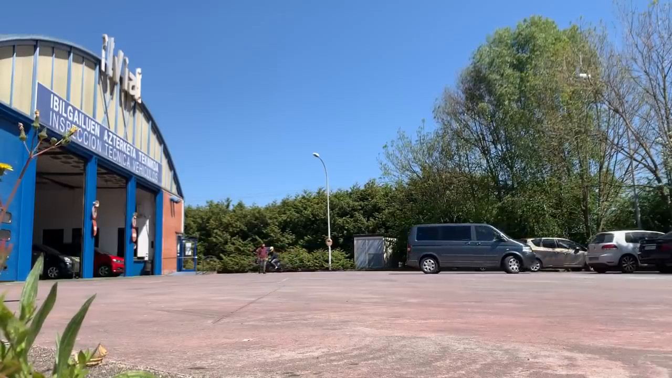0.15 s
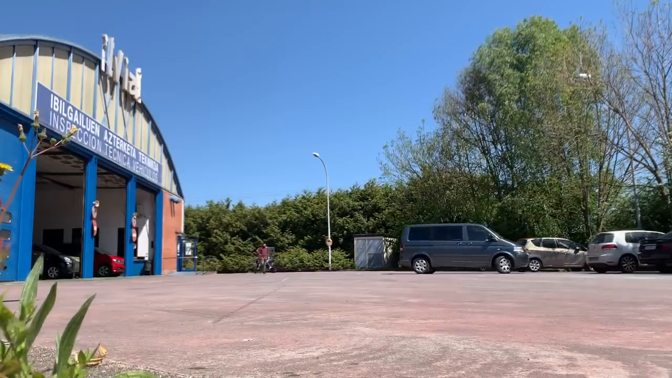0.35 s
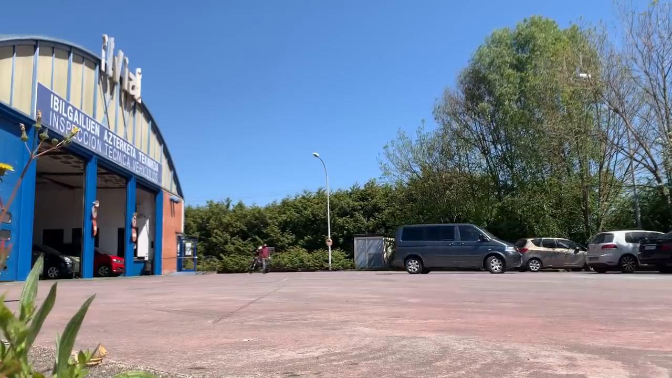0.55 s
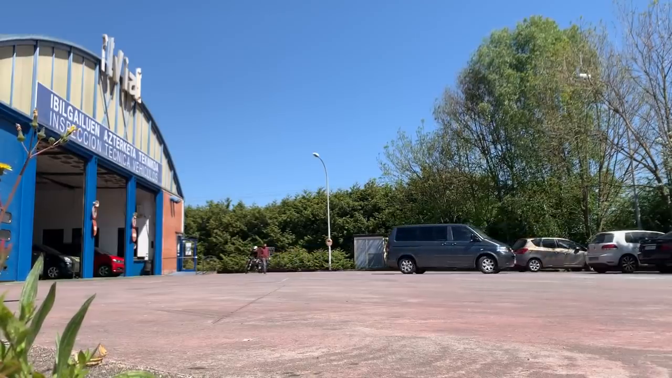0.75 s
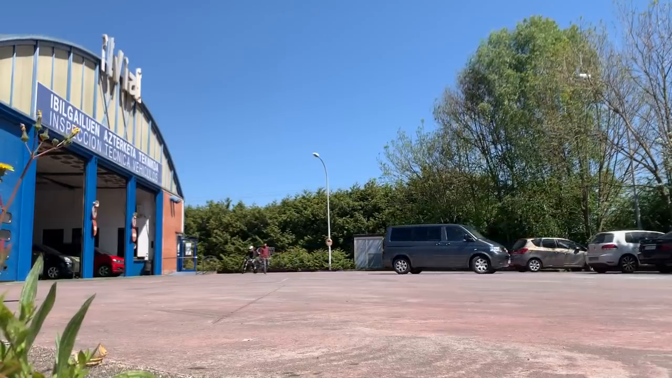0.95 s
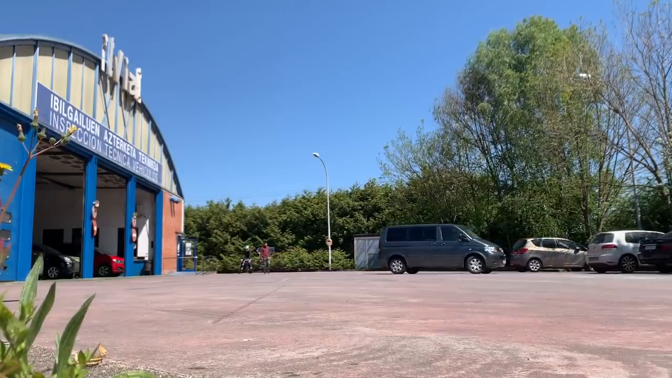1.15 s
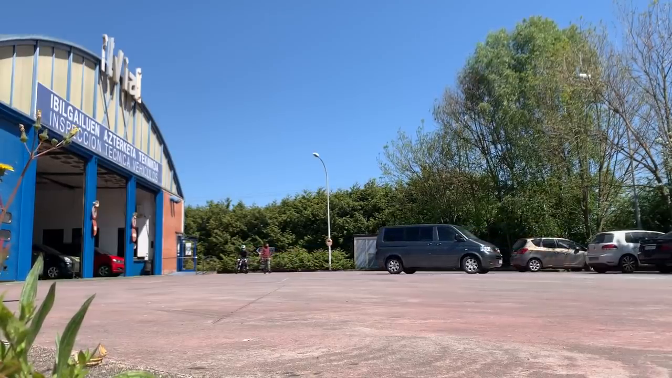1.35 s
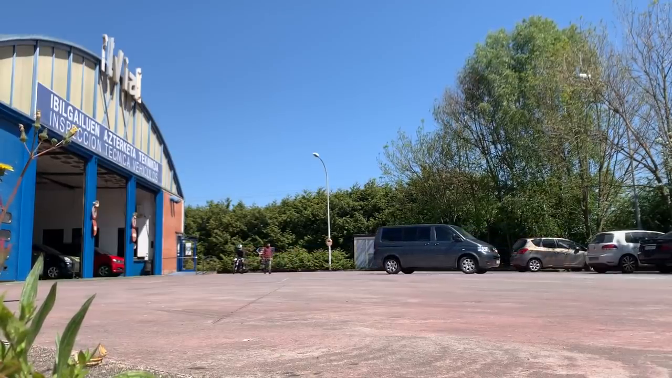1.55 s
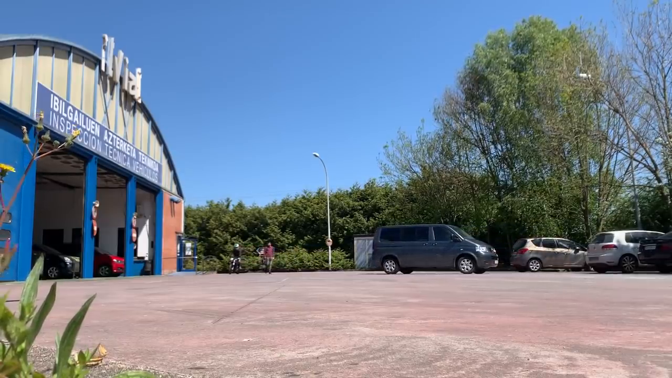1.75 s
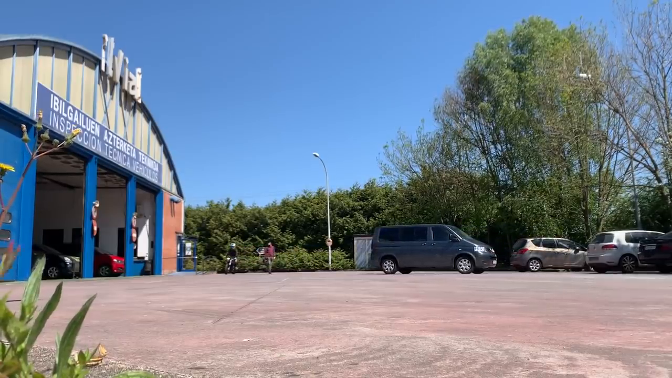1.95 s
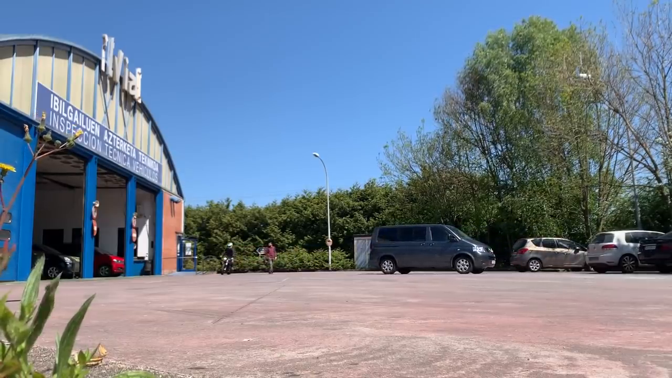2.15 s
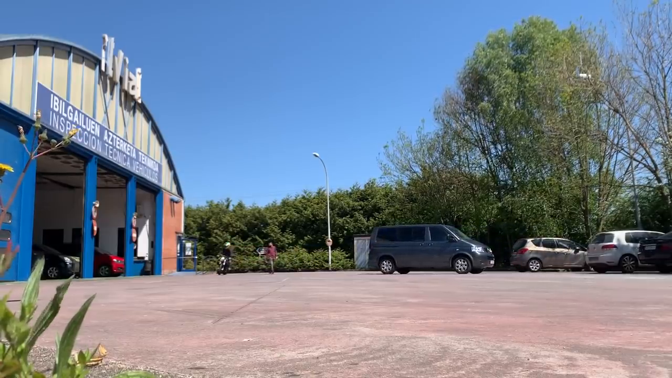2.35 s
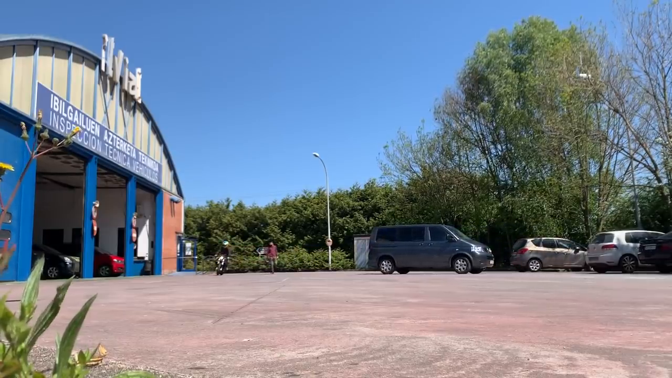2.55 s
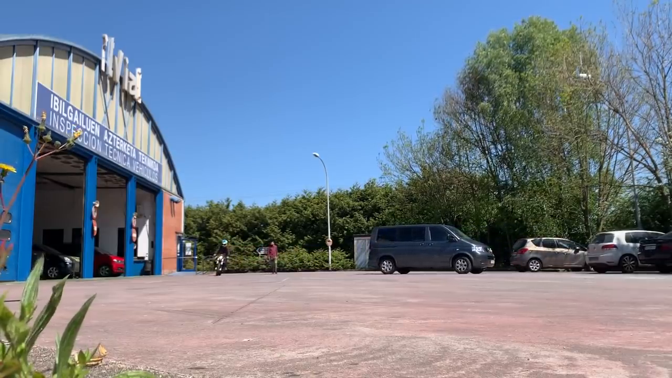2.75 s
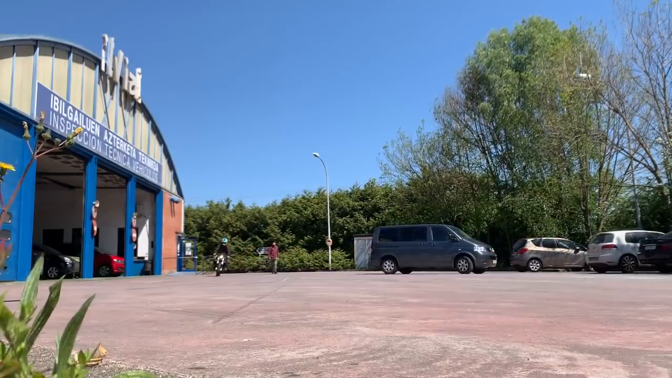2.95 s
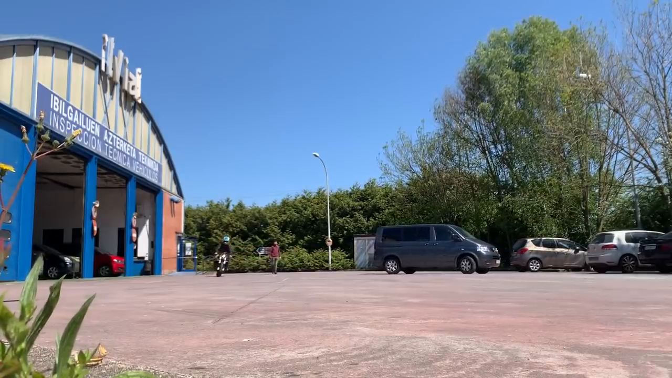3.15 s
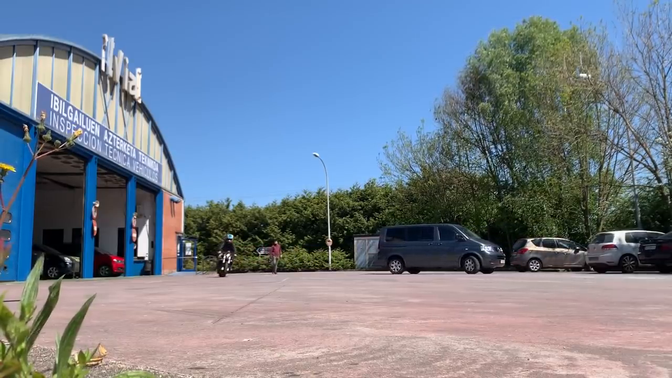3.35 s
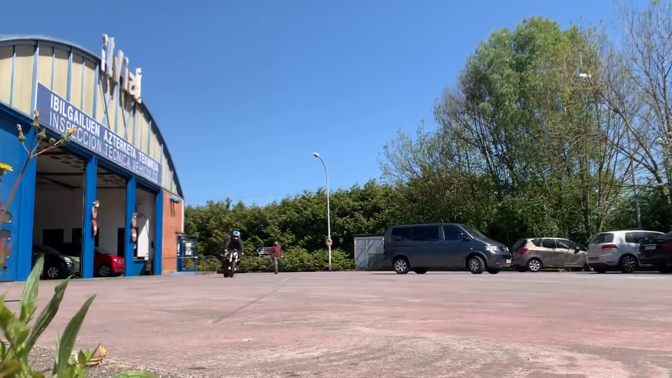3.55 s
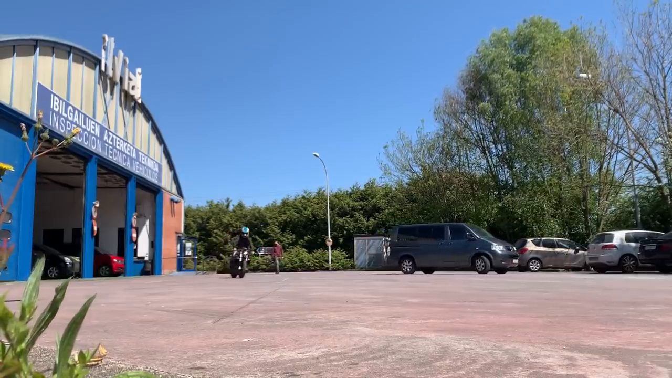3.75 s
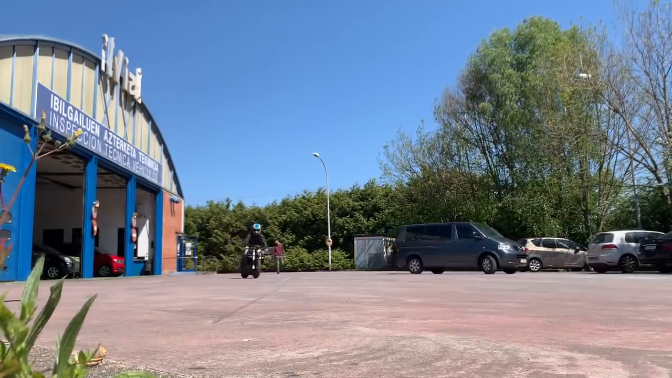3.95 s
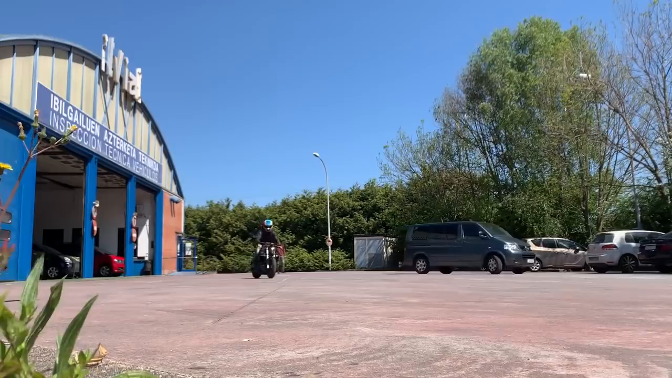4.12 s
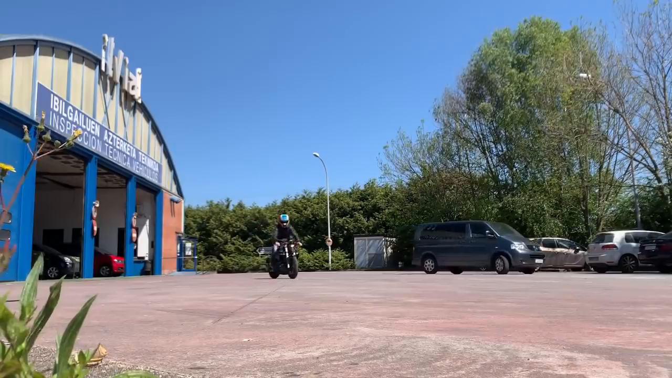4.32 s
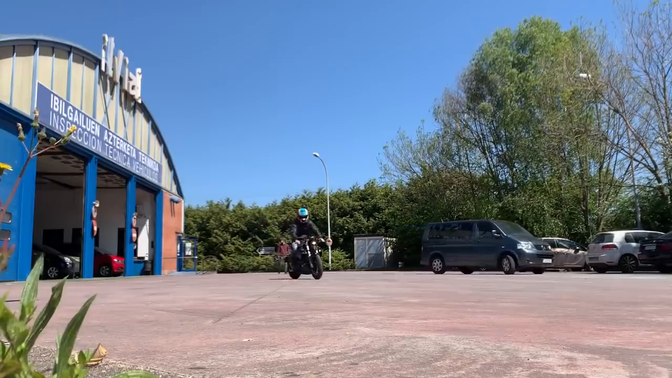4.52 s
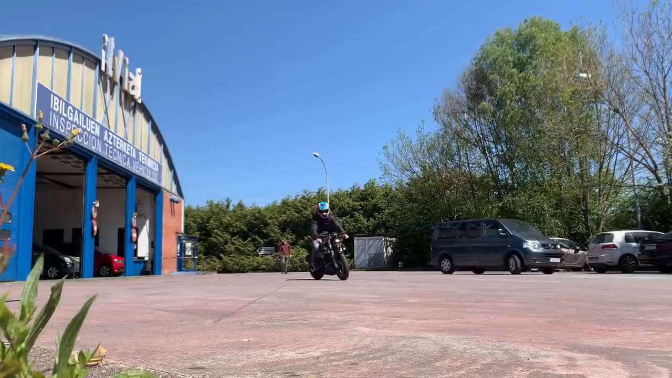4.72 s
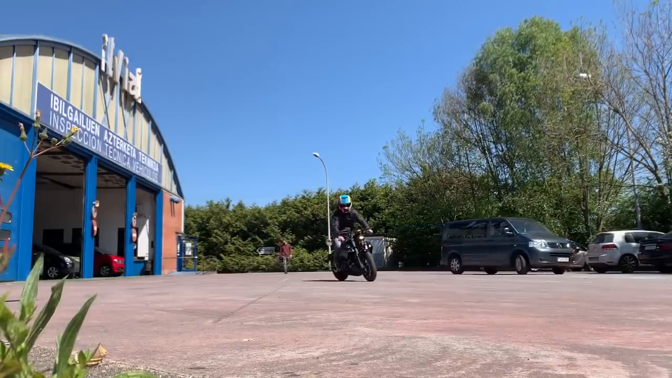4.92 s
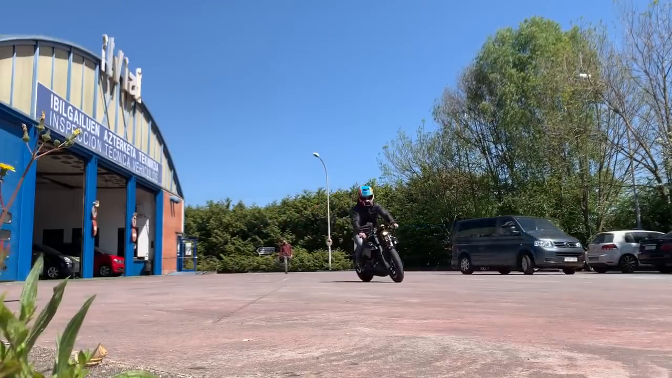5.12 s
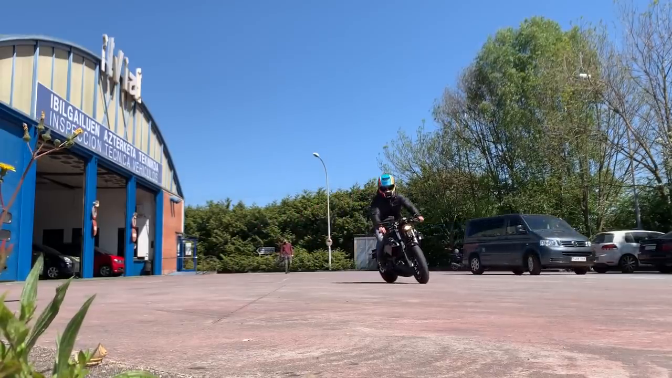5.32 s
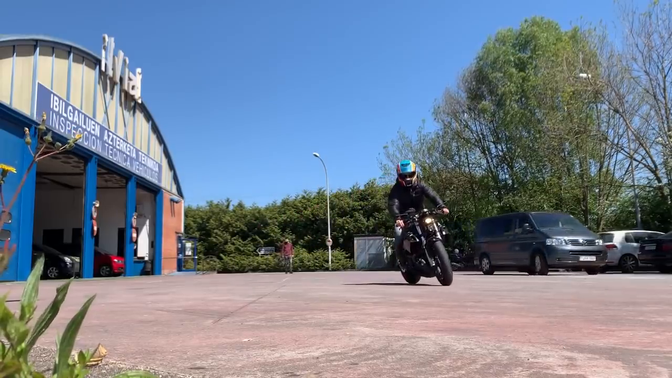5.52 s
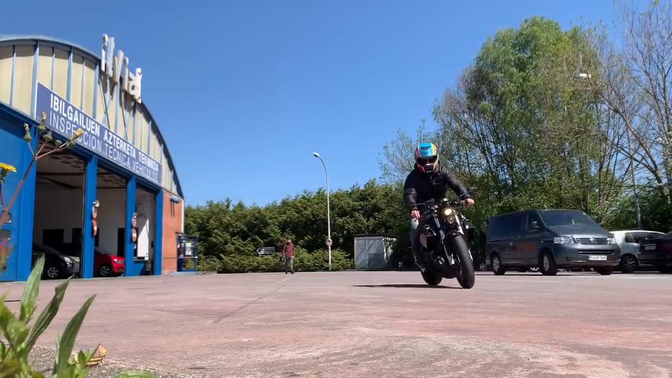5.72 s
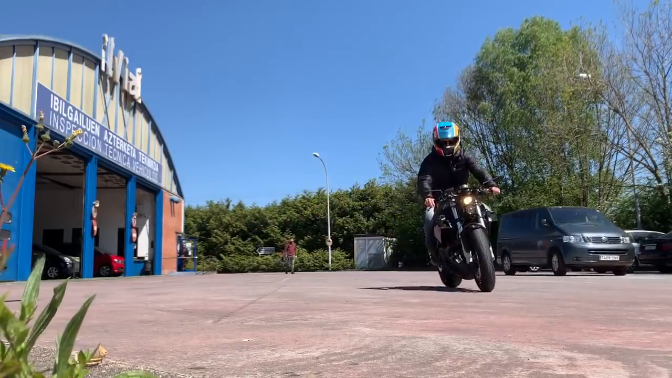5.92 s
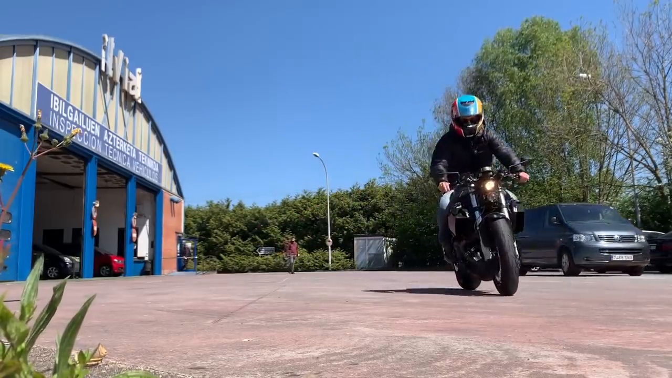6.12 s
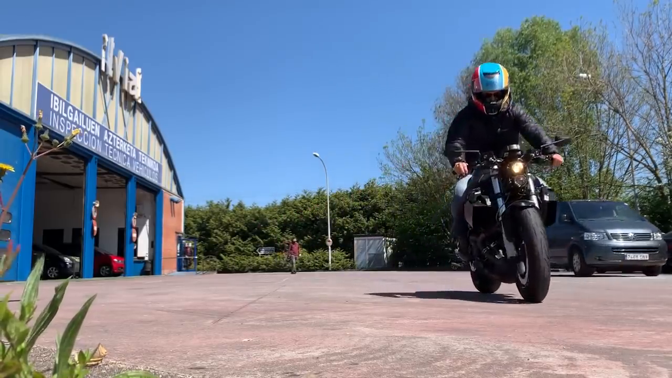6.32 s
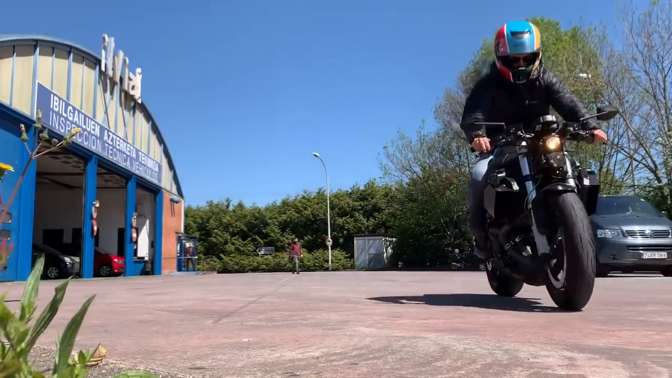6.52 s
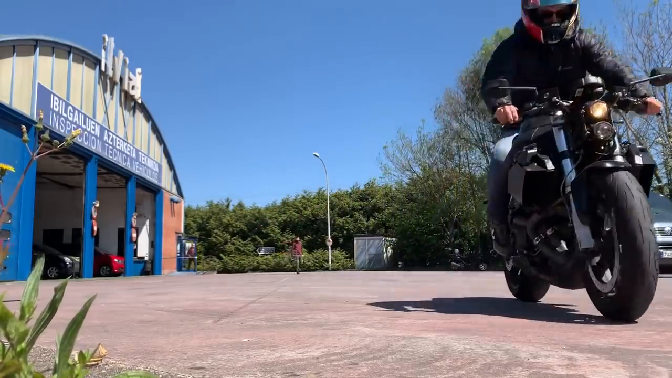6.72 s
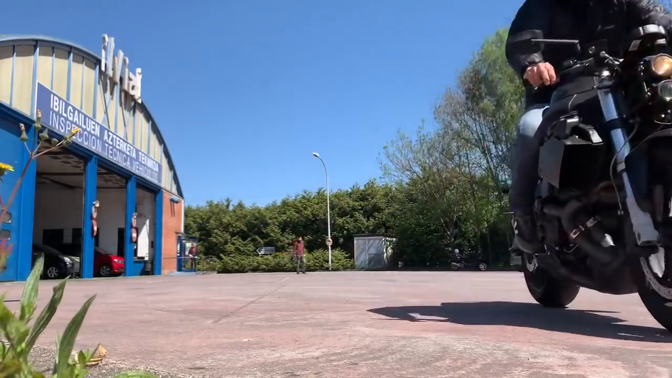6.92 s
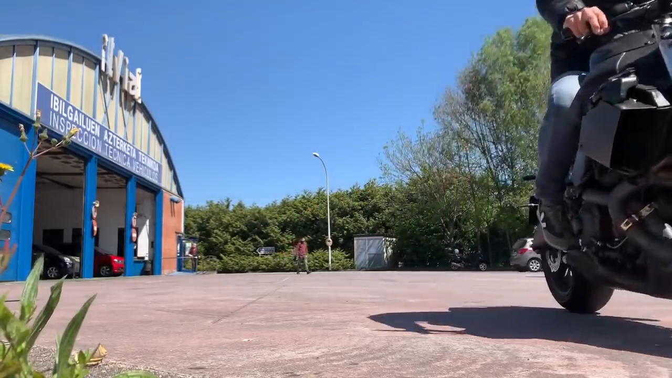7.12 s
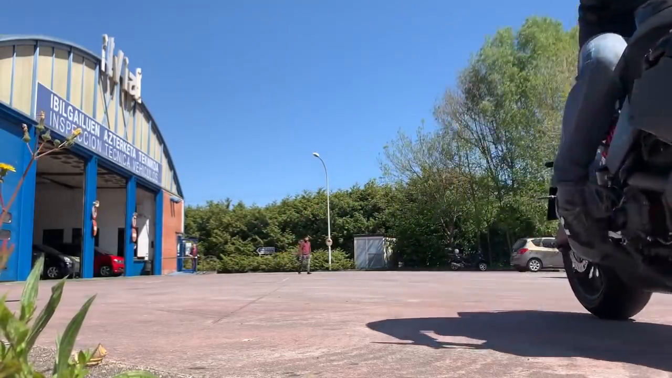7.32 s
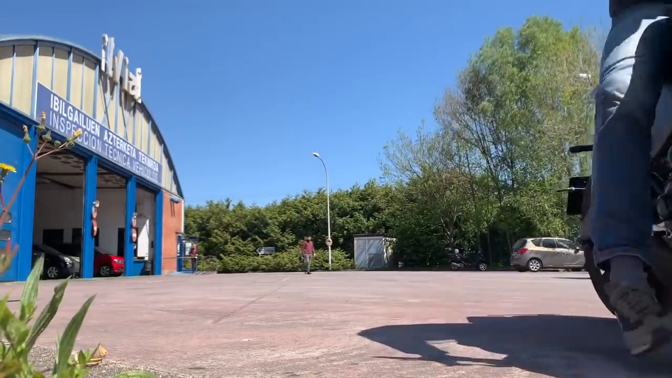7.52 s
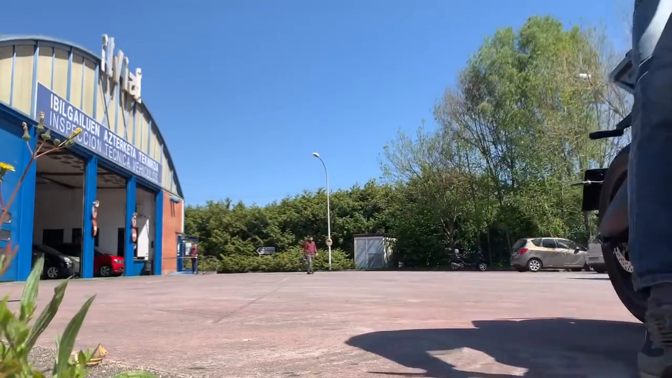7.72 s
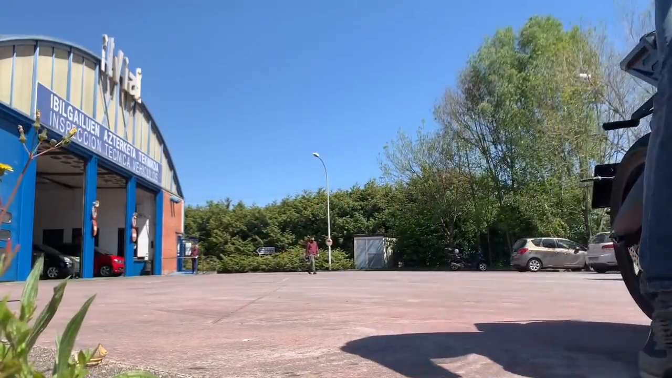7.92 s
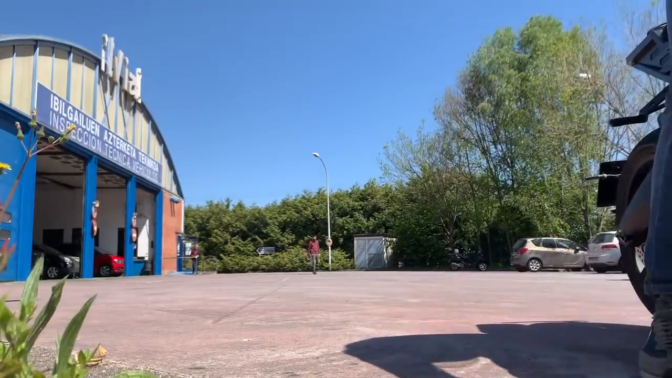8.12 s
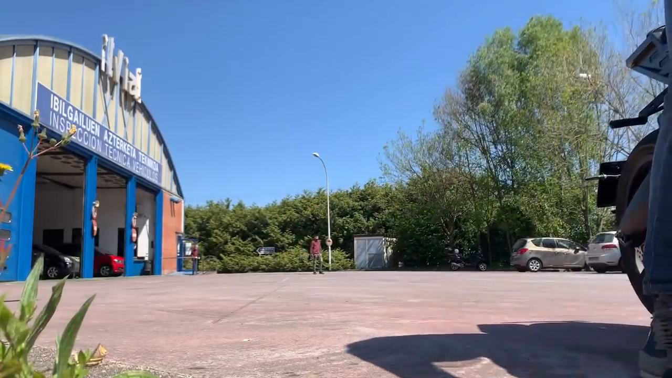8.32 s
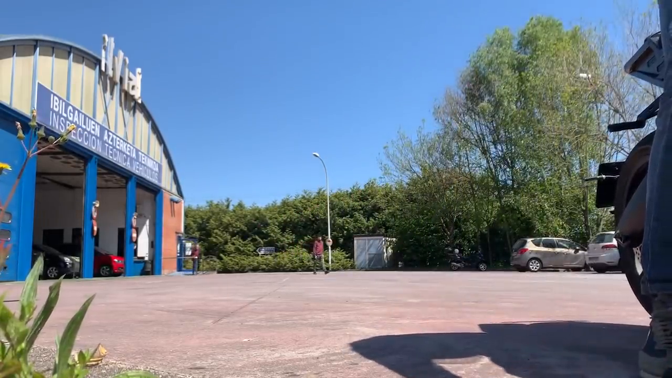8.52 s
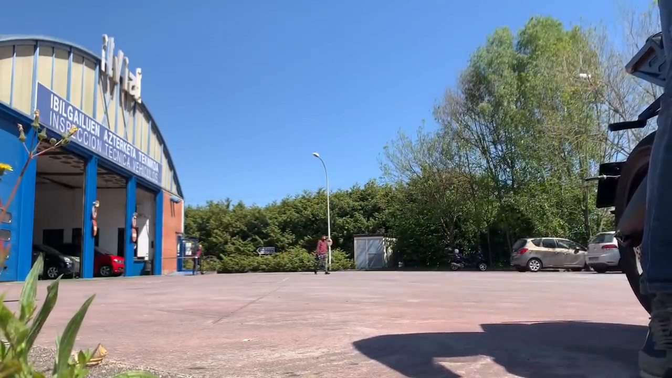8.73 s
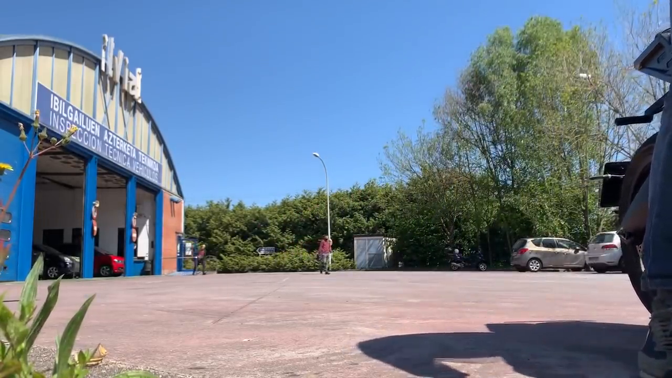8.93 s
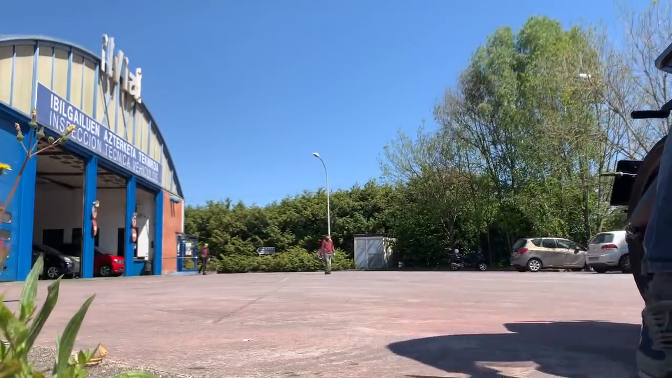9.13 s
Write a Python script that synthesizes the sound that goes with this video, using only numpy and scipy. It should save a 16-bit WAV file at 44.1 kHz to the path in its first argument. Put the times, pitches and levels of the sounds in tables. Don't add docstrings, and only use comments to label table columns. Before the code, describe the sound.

Open paved yard in stereo, light wall and tree echoes. From 0 to 2 s a two-cylinder motorcycle burbles softly far to the left, about 33 m off, while quick falling whistles and hoarse chirps sound to the right, mostly in the first second. At 2.6-3.7 s a van's low hum climbs in pitch with a rough roar, then dull knocks near 3.9 and 4.1 s. Two more whistles fall around 3.8-4.1 s, and tyre grit hisses lightly. From 4 s the motorcycle's exhaust thumps separate and strengthen, moving through the centre by 5 s. At 6-7.5 s it swells steeply to the right, with a sharp knock near 6.6 s, gear howl, bright valve ticks and pump whine. From 7.5 to 9.2 s it idles loudly about 1.5 m away: deep, uneven thumps at roughly 25 per second, some weak, with ringing metallic clatter, still running at the end.

```python
import sys
import numpy as np
from scipy import signal
from scipy.fft import rfft, irfft, next_fast_len
from scipy.io import wavfile
from scipy.ndimage import uniform_filter1d

SR = 44100
rng = np.random.default_rng(int(sys.argv[2]) if len(sys.argv) > 2 else 0)


def voltage_ratio(level):
    return 10 ** (np.asarray(level, float) / 20)


def unload_wav(signal):
    wavfile.write(
        sys.argv[1],
        SR,
        np.round(np.clip(np.atleast_2d(signal).T, -1, 1) * 32767).astype(np.int16),
    )


N = 404397
T = np.arange(N) / SR

# start_s, closeness_db, load_db, usual_puff_db
ENGINE = [(0, -25.5, -0.5, -38), (.5, -28, -3.5, -29), (1, -25.5, -1, -29), (1.7, -25, 0.5, -24.5),
          (2.05, -23.5, 0, -25.5), (2.7, -19.5, 3, -29.5), (3.1, -17, 3.5, -25), (3.5, -15.5, -2, -34),
          (4.05, -15.5, 5.5, -17), (4.2, -14.5, -4, -26), (4.9, -12, 2.5, -43), (5.3, -12.5, 1, -20),
          (5.8, -11, 6.5, -26.5), (6.3, -8, 0.5, -10), (6.9, -5, 8.5, -5.5), (7.5, -1, 8, -4),
          (8.2, -2, 7, -4), (9.17, -3, 2.5, -5)]
# near_db, slope (dB per dB of c), bend (dB per c squared)
FOLLOW = [
    (-20, 0.3351, -0.0035),
    (-21, 0.9779, 0.007),
    (-29, 1.36, 0.0057),
    (-39, 1.53, -0.0056),
]


def motorcycle():
    times, levels, front = firings()
    puffs = exhaust(times, levels, front)
    close_db, load_db, _ = along(ENGINE, T)
    rumble_db, roar_db, rattle_db, hiss_db = (db + a * close_db + b * close_db ** 2 for db, a, b in FOLLOW)
    rumble_db -= 8 * voltage_ratio(close_db)
    leaves_db = -80
    out = puffs + rumble(puffs, rumble_db + load_db - 1)
    out += voltage_ratio(roar_db + 1.5) * roar(times, front)
    out += voltage_ratio(rattle_db + 6.5) * rattle(times)
    out += np.hypot(voltage_ratio(hiss_db + 10.5), voltage_ratio(leaves_db + 10)) * hiss(times)
    return out + ticks() + pump() + grit()


# start_s, speed (engine cycles per s)
SPEED = [(0, 12.054), (1.14, 12.856), (1.38, 13.936), (1.67, 11.85), (2.11, 11.568), (3.2, 12.378),
         (3.54, 13.854), (4.28, 12.667), (4.77, 12.206), (5.05, 12.741), (5.54, 10.742), (6.23, 13.247),
         (6.77, 12.269), (7.76, 12.934), (8, 13.558), (8.24, 12.115), (8.58, 11.869), (9.17, 13.476)]
# start_s, loss_db (above 0 odd cycles, below 0 even ones)
LOPE = [(5.9, 1.5), (6.15, -7), (6.6, -9.5), (6.95, -10), (7.15, 0.5), (7.7, 1), (8.05, 16), (8.4, 4),
        (8.85, 0)]
# start_s, puff_db
ODD_FIRINGS = [(6.067, -12.5), (.424, -27), (0.742, -23.5), (.82, -25.5), (.979, -26), (1.027, -23),
               (1.103, -33), (1.752, -21), (1.926, -22), (2.774, -16), (3.017, -22), (3.417, -18),
               (3.459, -16), (3.533, -13), (3.604, -17.5), (3.68, -18.5), (3.859, -19.5), (3.921, -17),
               (3.955, -16), (3.994, -23), (4.033, -12), (4.079, -11.5), (4.125, -16), (4.165, -16),
               (4.763, -17), (5.007, -20), (5.29, -16), (5.468, -14), (4.805, -18), (5.045, -19.5),
               (5.376, -14), (5.648, -14), (5.735, -17.5), (5.821, -14), (5.898, -10.5), (5.99, -13.5),
               (6.774, -32), (7.411, -1.5), (6.184, -30), (6.735, -23), (6.933, -7), (7.801, -8.5),
               (7.952, -16), (8.102, -11)]
# start_s, distance_m, bearing (0 far left, 1 ahead, 2 beside on the right)
PATH = [(0, 33, 0), (2.5, 27, 0), (3.8, 16, 0), (4.6, 7.5, .3), (4.95, 7, 1), (6.0, 5.8, 1.08),
        (6.3, 5.5, 1.25), (6.65, 5.2, 1.5), (7, 3.9, 1.72), (7.6, 1.8, 1.92), (8.1, 1.6, 2), (9.17, 1.5, 2)]


def firings():
    first_turn, front_lead = -.146, .40
    turns = first_turn + np.cumsum(along(SPEED, T)[0]) / SR
    cycle = np.arange(int(turns[-1]) + 1)
    times = np.interp(np.r_[cycle, cycle + 1 - front_lead], turns, T, right=np.nan)
    front = np.repeat([0, 1], len(cycle))
    odd = np.tile(np.where(cycle % 2, 1, -1), 2)
    there = ~np.isnan(times)
    times, front, odd = times[there], front[there], odd[there]
    metres, bearing = along(PATH, times)
    levels = along(ENGINE, times)[2] - (1 - front) * np.maximum(odd * along(LOPE, times)[0], 0)
    levels -= front * 2 * np.clip(2 - bearing, 0, 1)
    levels += 4 * metres / (metres + 4) * rng.standard_normal(len(times))
    for s, db in ODD_FIRINGS:
        nearest = abs(times - s).argmin()
        times[nearest], levels[nearest] = s, db
    return times, levels, front


def exhaust(times, levels, front):
    out = np.zeros(N)
    luck = rng.standard_normal((len(times), 5))
    for s, db, f, l in zip(times, levels, front, luck):
        if s > .02:
            add(out, s - .0107 + 0.00048 * f * l[3], voltage_ratio(db + 1.75 * f * l[4]) * thump(f, l))
    return out


def thump(front, luck):
    t = np.arange(3000) / SR
    start_hz, end_hz, fall_s = ((500, 108, .0025), (420, 70, .005))[front]
    turns = (1 + .015 * luck[0]) * end_hz * t
    turns += (start_hz - end_hz) * fall_s * (1 - np.exp(-t / fall_s))
    rise_s, shut_s, sudden = ((.0065, .0198, 6), (.0045, .023, 2))[front]
    swell = (1 - np.exp(-(t / rise_s) ** 2)) * np.exp(-(t / shut_s) ** sudden)
    blow = voltage_ratio(3.5 - 4 * front) * swell * np.cos(2 * np.pi * (turns - .04 - .12 * front))
    late = np.maximum(t - .020, 0)
    ring = np.sin(2 * np.pi * 206 * (1 + .015 * luck[1]) * late)
    ring *= voltage_ratio(-60 * late / .16) * np.minimum(late / .002, 1)
    return blow + voltage_ratio(-15 + 8.73 * front + 2.3 * luck[2]) * ring


# pitch_hz, level_db (per Hz)
RUMBLE = [(20, -55), (40, -7), (65, 3), (100, -0.5), (150, -3.5), (210, -11), (300, -13.5), (450, -19)]


def rumble(puffs, level_db):
    out = voltage_ratio(level_db) * noise(RUMBLE) + voltage_ratio(-22) * echoes(puffs, .3)
    add(out, 0.02355, -voltage_ratio(-13.5) * puffs)
    return out


# pitch_hz, level_db (per Hz)
ROAR = [(150, -33), (300, -1), (550, 2.5), (1100, -1.5), (1400, 1.5), (1750, -11), (2200, -13.5),
        (3000, -43.5)]
# pitch_hz, width_hz, level_db (on the roar)
CASING = [
    (758, 85, -5.5),
    (1174, 53, -14),
    (1560, 950, -15.5),
]
# start_s, pitch_hz, level_db (on the roar)
HOWL = [(0, 1020, -12.5), (3, 973, -4.5), (5, 995, -10), (6.1, 975, -1.5), (6.6, 972, 1), (7.3, 959, -7),
        (8, 916, -10.5), (9.17, 910, -7.5)]


def roar(times, front):
    howl_hz, howl_db = along(HOWL, T)
    howl = resonate(resonate(rng.standard_normal(N), howl_hz, 80), howl_hz, 80)
    front_swell = 0.38 * bursts(times[front > 0], 0.018, 0.068, 3.3)
    rear_swell = 0.56 * bursts(times[front < 1], .015, 0.016, 3.4)
    return (noise(ROAR, CASING) + voltage_ratio(howl_db) * evened(howl)) * evened(1 + front_swell + rear_swell)


# pitch_hz, level_db (per Hz)
RATTLE = [(1300, 3), (2000, 6), (3000, -1.5), (3800, -2.5), (5000, -5.5), (6500, -11), (8500, -41)]
# pitch_hz, width_hz, level_db (on the rattle)
COVERS = [
    (2580, 77, -56),
    (3500, 66, -19),
    (4800, 250, -20),
]


def rattle(times):
    return noise(RATTLE, COVERS) * evened(1 + 0.6 * bursts(times, 0.025, 0.0044, 5))


# pitch_hz, level_db (per Hz)
HISS = [(4000, -31), (6000, -1.5), (8500, 1), (11000, -4), (13000, -2.5), (14300, -6), (15600, -17),
        (15800, -40)]


def hiss(times):
    return noise(HISS) * evened(1 + 1.2 * bursts(times, .014, .0025, 5))


def bursts(times, lead_s, decay_s, spread_db):
    train = np.zeros(N)
    luck = np.clip(rng.standard_normal((len(times), 2)), -1.6, 1.6)
    at = np.clip(((times - lead_s + 0.002 * luck[:, 0]) * SR).astype(int), 0, N - 1)
    train[at] = voltage_ratio(spread_db * luck[:, 1]) / (1 + along(PATH, times)[0] / 12)
    t = np.arange(1500) / SR
    return signal.oaconvolve(train, np.minimum(t / 0.00043, 1) * np.exp(-t / decay_s))[:N]


# start_s, peak_db
TICKS = [(4.236, -37), (4.787, -36), (5.6844, -29), (6.253, -29), (6.0945, -31), (6.361, -27),
         (6.408, -27.5), (6.563, -20.5), (6.6425, -25), (6.673, -25), (6.806, -25), (6.968, -19),
         (7.044, -25), (7.1281, -20.5), (7.206, -26), (7.286, -32), (7.3666, -18), (7.3985, -33),
         (7.4414, -19), (7.5192, -21), (7.602, -17), (7.6305, -20), (7.6769, -21), (7.7073, -28),
         (7.753, -17), (7.8315, -18), (7.862, -18), (7.8884, -21), (7.9095, -16), (7.982, -15),
         (8.0131, -26), (8.1328, -21), (8.1643, -31), (8.2122, -20), (8.2975, -21), (8.3314, -24),
         (8.4641, -22), (8.501, -29), (8.6327, -22), (8.6656, -19), (8.714, -22), (8.7943, -24),
         (8.8263, -19.5), (8.8712, -26), (8.9355, -27), (8.951, -19.5), (9.1046, -20)]
# pitch_hz, level_db (per Hz)
TICK = [(3500, -19), (6000, -2), (9000, 1), (13000, -0.5), (15600, 2), (15800, -42)]
# start_s, peak_db, pitch_hz
CLATTER = [(6.9487, -29, 4520), (6.957, -29, 3440), (7.4321, -27, 3630), (7.5, -30, 3430),
           (7.5898, -35, 3440), (7.6576, -21, 3630), (7.7444, -15, 3610), (7.8177, -10, 3660),
           (7.8432, -19, 3650), (7.8886, -18, 3580), (7.9268, -13, 4510), (7.9953, -28, 3420),
           (8.0462, -15.5, 3770), (8.154, -13.5, 4780), (8.2014, -18, 3610), (8.3201, -31, 3680),
           (8.3595, -22, 3580), (8.4865, -16, 3330), (8.532, -33, 3470), (8.6553, -21, 4900),
           (8.7845, -23, 2930), (8.7845, -13, 3530), (8.8534, -13, 3650), (8.9402, -20, 3320),
           (9.015, -21, 3560), (9.0455, -16, 3620), (9.0917, -23, 3260), (9.091, -12, 3300)]


def ticks():
    train, knocks = np.zeros(N), np.zeros(N)
    t = np.arange(800) / SR
    for s, db in TICKS:
        train[round(s * SR)] = voltage_ratio(db + 0.5)
    for s, db, hz in CLATTER:
        fade = voltage_ratio(db - 7.0 - 60 * t / 0.053) * np.minimum(t / .0008, 1)
        add(knocks, s, fade * np.sin(2 * np.pi * hz * t))
    puff = np.minimum(t / .0005, 1) * np.exp(-t / 0.0036)
    return knocks + noise(TICK) * signal.oaconvolve(train, puff)[:N]


# pitch_hz, level_db
PUMP = [
    (511.3, 0),
    (503.9, -4),
]
# start_s, level_db
PUMP_DB = [(5, -60), (5.7, -36), (6.5, -29), (7.3, -24), (7.9, -23.5), (9.17, -26.5)]


def pump():
    whine = sum(voltage_ratio(db) * np.cos(2 * np.pi * hz * (T - 7.82)) for hz, db in PUMP)
    return voltage_ratio(along(PUMP_DB, T)[0] - 2.0) * whine


# pitch_hz, level_db (per Hz)
GRIT = [(7500, -34), (8500, 1.5), (11000, -4), (14000, -9), (15000, -25)]
# start_s, level_db
GRIT_DB = [(3.6, -80), (3.85, -53), (4.2, -47.5), (4.8, -49.5), (5, -62), (5.7, -46), (6.2, -55)]


def grit():
    return voltage_ratio(along(GRIT_DB, T)[0]) * noise(GRIT)


# start_s, pitch_hz, level_db
VAN = [(2.6, 96.6, -35), (2.8, 101.2, -36), (3.05, 118.4, -35), (3.15, 121.4, -35), (3.292, 129.6, -26),
       (3.45, 133.8, -26.5), (3.552, 138, -30), (3.644, 140, -35.5), (3.7, 137, -45)]
# pitch_hz, level_db (per Hz)
VAN_ROAR = [(300, -5), (500, -0.5), (740, -3), (900, -11), (1300, -5)]
# start_s, level_db
VAN_ROAR_DB = [(0, -46), (2.3, -44.5), (2.7, -35.5), (3.1, -33), (3.6, -31.5), (3.8, -44), (4.2, -40),
               (4.6, -52)]
# start_s, peak_db, dullness (samples)
BUMPS = [
    (3.583, -36, 16),
    (3.926, -27.5, 64),
    (4.127, -34, 63),
    (6.588, -17.5, 9),
]


def van():
    hz, db = along(VAN, T)
    phase = phase_of(hz)
    on = np.interp(T, [VAN[0][0], VAN[1][0], VAN[-2][0], VAN[-1][0]], [0, 1, 1, 0])
    out = on * voltage_ratio(db + 5) * (np.sin(phase) + .2 * np.sin(1.5 * phase) + .1 * np.sin(2 * phase))
    out += on * voltage_ratio(-39.5) * evened(resonate(rng.standard_normal(N), 5.8 * hz, 14))
    out += voltage_ratio(along(VAN_ROAR_DB, T)[0]) * noise(VAN_ROAR)
    t = np.arange(2000) / SR
    for s, peak_db, dull in BUMPS:
        knock = uniform_filter1d(rng.standard_normal(len(t)), max(round(dull), 1))
        add(out, s, voltage_ratio(peak_db) * evened(knock) * np.exp(-t / 0.022))
    return out


def birds():
    out = whistles() + chirps()
    add(out, .026, voltage_ratio(-18) * out.copy())
    trees = np.array([echoes(out, .22), echoes(out, .22)])
    return out * voltage_ratio([[-4], [3]]) + voltage_ratio(-5.5) * trees


# start_s, length_s, pitch_hz at the start, pitch_hz at the end, level_db
NOTES = [(0.123, 0.11, 8260, 5200, -41), (0.316, 0.103, 7600, 5170, -41.5), (0.485, 0.041, 6680, 4800, -36),
         (0.582, 0.042, 6480, 4970, -36.5), (0.698, 0.049, 6200, 4800, -43), (0.4, 0.0197, 6350, 5200, -37),
         (0.12, 0.036, 2950, 4330, -52), (1.384, .018, 3380, 3900, -47), (2.17, 0.014, 4250, 4400, -57),
         (3.82, 0.094, 7430, 6740, -42), (4.033, 0.094, 7100, 6100, -46)]


def whistles():
    out = np.zeros(N)
    drop_s, slide = .008, .35
    for s, length, start_hz, end_hz, db in NOTES:
        u = np.arange(int(length * SR)) / (length * SR)
        fall = slide * u + (1 - slide) * np.exp((u - 1) * length / drop_s)
        phase = phase_of(wavering(start_hz + (end_hz - start_hz) * fall, .012, 60))
        tone = np.sin(phase) + voltage_ratio(-34) * np.sin(2 * phase)
        add(out, s, voltage_ratio(db - 3.0) * np.sin(np.pi * u ** 2.2) ** 0.48 * tone)
    return out


# start_s, length_s, pitch_hz at the top, pitch_hz at the end, level_db
CHIRPS = [(.058, .032, 4450, 3430, -49), (.752, .028, 4180, 3450, -48), (0.79, 0.04, 3700, 3320, -51),
          (0.148, .012, 3400, 3150, -58), (1.306, .036, 4440, 3500, -49), (2.087, .032, 4500, 3700, -49),
          (2.17, .016, 3800, 3550, -53)]


def chirps():
    out = np.zeros(N)
    flick_s, flick, fork, fork_db = .006, .2, 1.1, -5
    for s, length, top_hz, end_hz, db in CHIRPS:
        u = np.arange(int(length * SR)) / (length * SR)
        hz = (top_hz + (end_hz - top_hz) * u ** 2) * (1 - flick * np.exp(-(u * length / flick_s) ** 2))
        phase = phase_of(wavering(hz, .035, 40))
        tone = np.sin(phase) + voltage_ratio(fork_db) * (1 - u) * np.sin(fork * phase)
        add(out, s, voltage_ratio(db) * np.sin(np.pi * u) ** 0.43 * tone)
    return out


def wavering(hz, share, smooth):
    return hz * (1 + share * evened(uniform_filter1d(rng.standard_normal(8000), size=smooth))[:len(hz)])


def phase_of(hz):
    return 2 * np.pi * np.cumsum(hz) / SR


def evened(x):
    return x / np.sqrt(np.mean(x ** 2) + 1e-20)


def along(table, x):
    at, *columns = np.transpose(table)
    return [np.interp(x, at, c) for c in columns]


def add(mix, s, sound):
    part = mix[..., max(round(s * SR), 0):][..., :sound.shape[-1]]
    part += sound[..., :part.shape[-1]]


def noise(spectrum, modes=()):
    size = next_fast_len(N)
    hz = np.fft.rfftfreq(size, 1 / SR)
    f, db = np.transpose(spectrum)
    colour = voltage_ratio(np.interp(np.log(hz + 1), np.log(f), db, -90, -90))
    for mode_hz, width_hz, mode_db in modes:
        colour = colour + voltage_ratio(5.5 + mode_db) / np.hypot(1, (2 * (hz - mode_hz) / width_hz) ** 2)
    return evened(irfft(rfft(rng.standard_normal(size)) * colour, size)[:N])


def resonate(x, hz, width_hz):
    turn = np.exp(1j * phase_of(hz))
    r = np.exp(-np.pi * width_hz / SR)
    return 2 * (turn * signal.lfilter([1 - r], [1, -r], x / turn)).real


def echoes(x, t60):
    t = np.arange(SR // 2) / SR
    tail = rng.standard_normal(len(t)) * voltage_ratio(-60 * t / t60)
    return signal.oaconvolve(x, tail / np.linalg.norm(tail))[:N]


# start_s, dip_hz, dip_db, hump_db (above the dip)
GROUND = [(0, 1580, -6.5, -1.5), (3, 1520, -1, 0.5), (5, 1620, -5.5, 0.5), (6.5, 1760, -10, 1.5),
          (7.25, 1880, -10.5, 3.5), (7.7, 2270, -3.5, 1.5), (9.17, 2150, -3.5, 1.5)]
# start_s, level_db (near 3910 Hz)
SHADE = [(4.1, 2), (4.17, -8), (4.8, -6), (4.9, 2), (6.0, 2), (6.3, -3.5), (6.95, 2.5), (7.3, 1)]


def air_and_ground(hz, t, metres):
    dip_hz, dip_db, hump_db = along(GROUND, t)
    width_hz = 268
    colour_db = .15 * metres * (1 - (np.maximum(hz, 7000) / 7000) ** 2)
    colour_db += dip_db * np.exp(-((hz - dip_hz) / width_hz) ** 2)
    colour_db += hump_db * np.exp(-((hz - 1.45 * dip_hz) / (2 * width_hz)) ** 2)
    return colour_db + along(SHADE, t)[0] * np.exp(-((hz - 3910) / 630) ** 2)


BEARINGS = [0, 1, 1.5, 2]
# pitch_hz, then radians far left, ahead, passing, beside
PORTS = [(520, .3, -.3, -.5, -1.5), (1350, .6, -.3, -.7, -1.8), (1660, -3.3, -3, -2.9, -2.9),
         (1900, -1.6, -1.4, -1.8, -3.6), (2240, -1.5, -1.3, -1.8, -3.9), (2930, 2.3, -2.5, -3.1, -4.1),
         (3300, 2, -1, -3.2, -5.4), (3950, 1.8, -.4, -2.6, -6.5), (4400, 2, -.3, -1.5, -6.6),
         (5000, 2.6, -.8, -2.7, -8.2), (5340, -3.4, -2.2, -3.2, -8.8), (6100, -5.4, -4.6, -5.8, -6),
         (6750, -5.6, -5.4, -5.8, -5.4), (7400, -5.8, -7.2, -6.6, -8.3), (8100, -8.3, -8.8, -7.7, -7.9)]
# pitch_hz, share far left, share ahead, share beside
LIKENESS = [(60, .85, .9, .96), (150, .95, .96, .985), (400, .75, .85, .94), (1000, .8, .93, .95),
            (1520, .5, .4, .65), (1720, .65, .9, .8), (1950, .7, .82, .8), (2300, .5, .9, .55),
            (2950, .4, .9, .9), (3800, .35, .7, .78), (5000, .6, .6, .3), (5340, .97, .86, .5),
            (6000, .3, .55, .15), (6500, .35, .7, .45), (8000, .4, .65, .35)]
# pitch_hz, far_db, beside_db
LEAN = [(60, -.3, -.7), (150, 0, -1), (400, 1, -3), (800, 2, -7.5), (1300, 2.5, -5), (1700, 2.5, 3),
        (2300, 0, -1), (3500, -1.5, -2), (6500, -3, -3), (8000, 0, -2)]


def ports(x):
    frame = dict(nperseg=512, noverlap=384)
    hz, t, z = signal.stft(x, SR, **frame)
    white = signal.stft(rng.standard_normal(N), SR, **frame)[2]
    power = abs(uniform_filter1d(abs(z) ** 2, size=5, axis=1))
    other = white * np.sqrt(power / np.mean(abs(white) ** 2))
    metres, bearing = along(PATH, t)
    shares = np.array([np.interp(bearing, BEARINGS, row) for row in np.eye(len(BEARINGS))])
    phase = np.transpose(along(PORTS, hz)) @ shares * np.minimum(hz[:, None] / PORTS[0][0], 1)
    far, ahead, beside = along(LIKENESS, hz)
    same = np.transpose([far, ahead, ahead, beside]) @ shares
    far_db, beside_db = (c[:, None] for c in along(LEAN, hz))
    lean_db = far_db + (beside_db - far_db) * np.clip(1.8 * (bearing - 1), 0, 1)
    hz = hz[:, None]
    top = hz > 8250
    turn = 2 * np.pi * (10180 - hz) / 3150
    phase = np.where(top, np.angle(np.cos(turn) + .25j * np.sin(turn)), phase)
    same = np.where(top, 1 - .5 * np.sin(turn) ** 4, same)
    same = same * (1 - .3 * top * (hz < 9300) * np.clip(5 * (bearing - 1.8), 0, 1))
    lean = voltage_ratio(np.where(top, 0, lean_db) / 2)
    right = same * z * np.exp(-1j * phase) + np.sqrt(1 - same ** 2) * other
    mid, side = (z * lean + right / lean) / 2, (z * lean - right / lean) / 2
    mid_power, side_power = (uniform_filter1d(uniform_filter1d(abs(v) ** 2, size=3, axis=0), size=9, axis=1)
                             for v in (mid, side))
    mid *= mid_power > voltage_ratio(2 * -9) * side_power
    both = np.array([mid + side, mid - side]) * voltage_ratio(air_and_ground(hz, t, metres))
    return signal.istft(both, SR, **frame)[1][:, :N]


def scene():
    return ports(motorcycle() + van()) + birds()


def band_limit(x):
    return signal.sosfilt(signal.butter(12, 15740, fs=SR, output="sos"), x)


def record(dry):
    limited = np.tanh(dry / 1.05)
    return band_limit(limited)


dry = scene()
out = record(dry)
unload_wav(out)
```